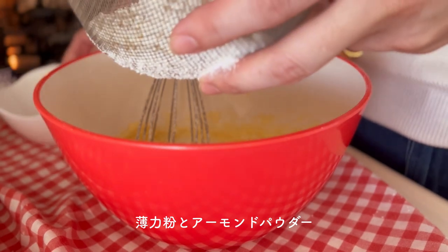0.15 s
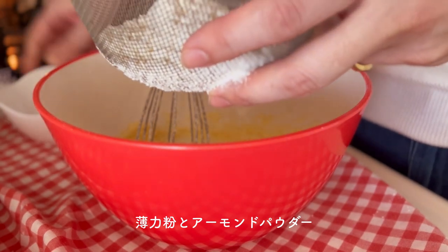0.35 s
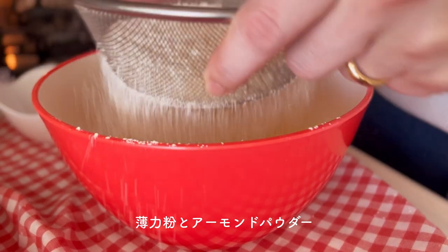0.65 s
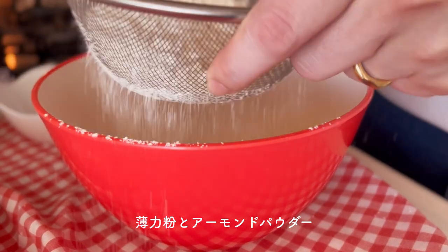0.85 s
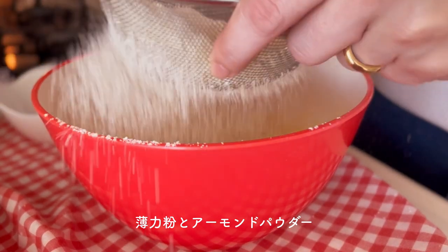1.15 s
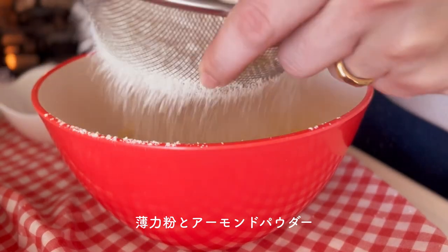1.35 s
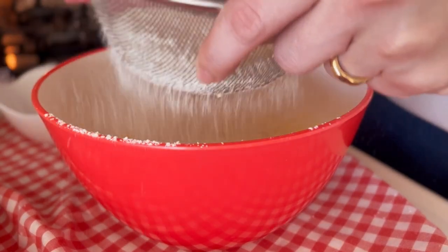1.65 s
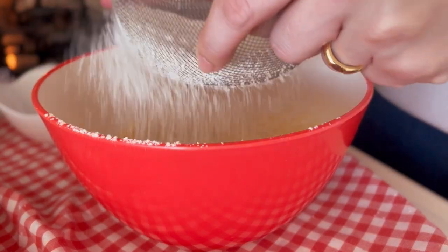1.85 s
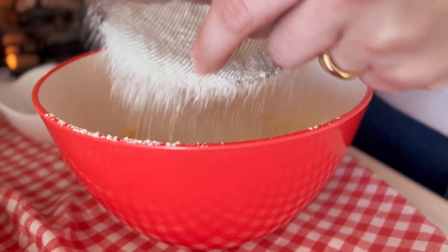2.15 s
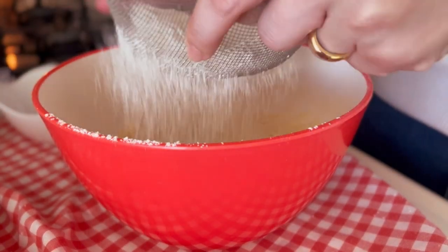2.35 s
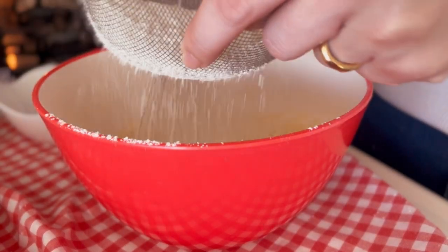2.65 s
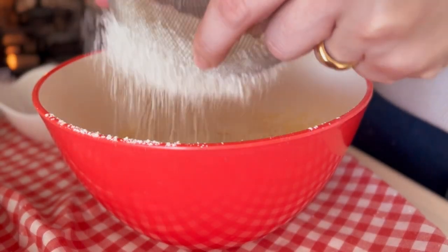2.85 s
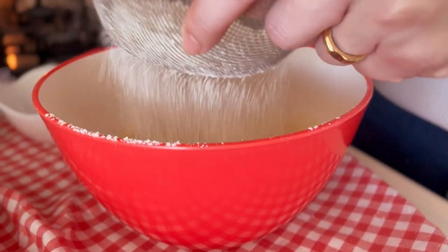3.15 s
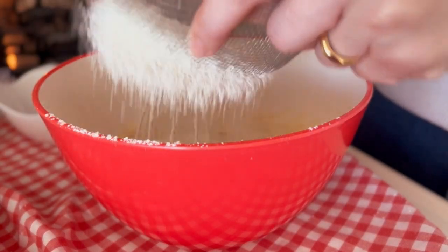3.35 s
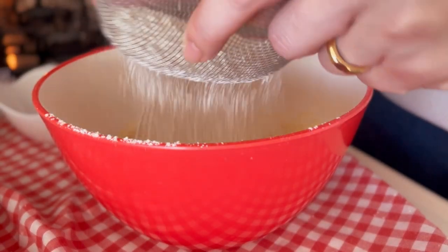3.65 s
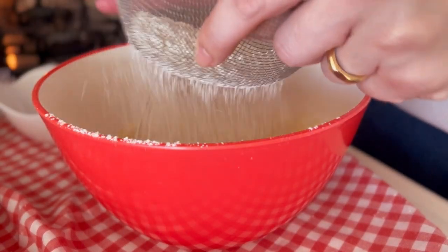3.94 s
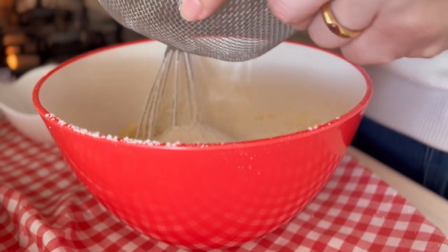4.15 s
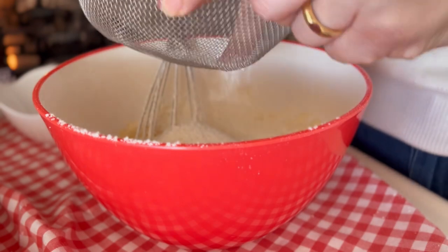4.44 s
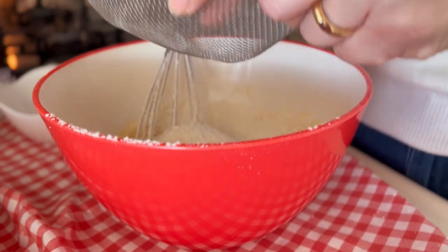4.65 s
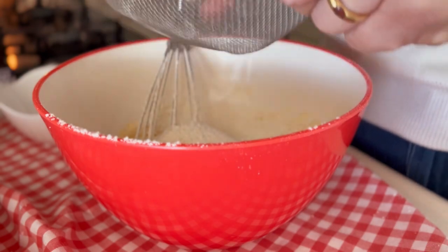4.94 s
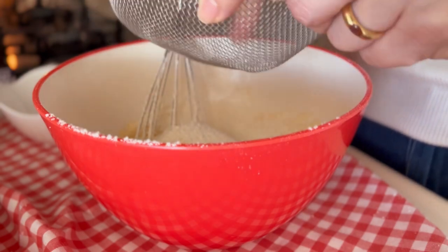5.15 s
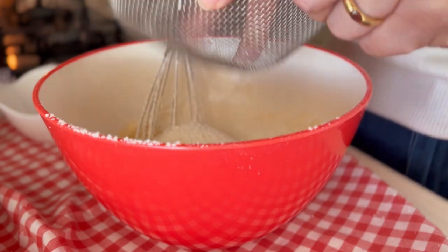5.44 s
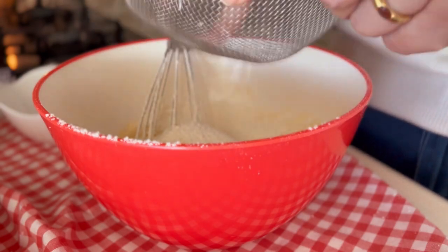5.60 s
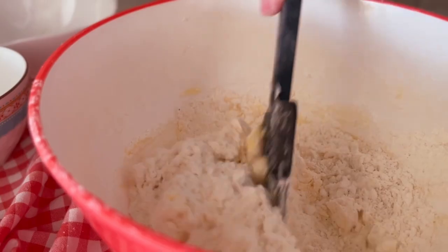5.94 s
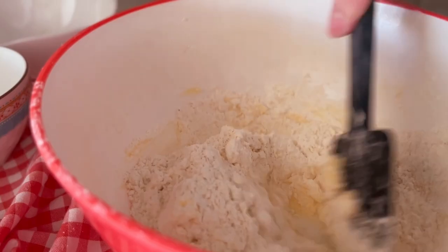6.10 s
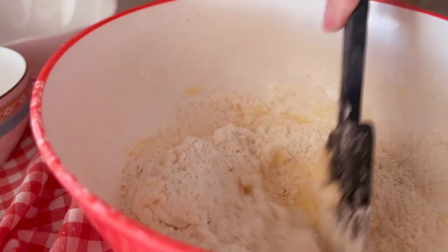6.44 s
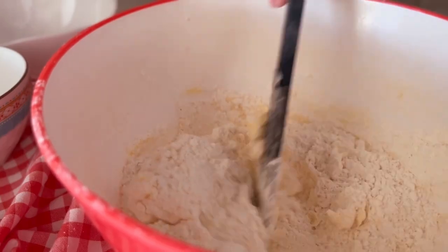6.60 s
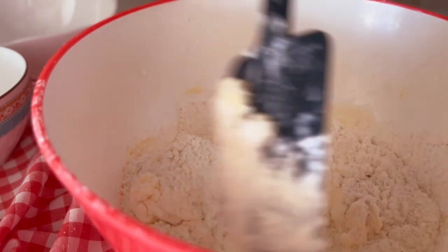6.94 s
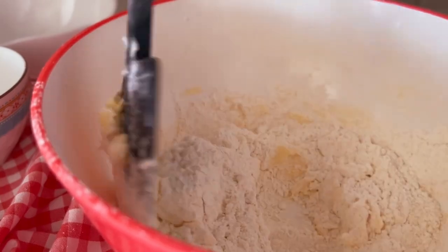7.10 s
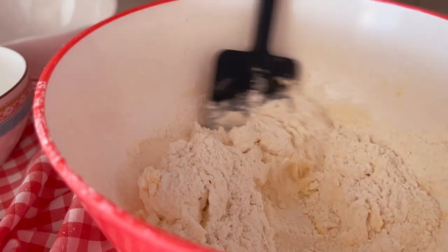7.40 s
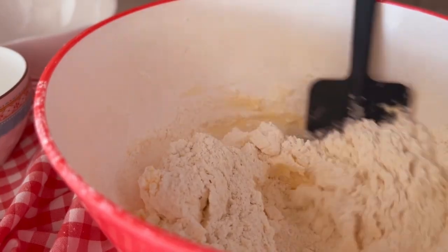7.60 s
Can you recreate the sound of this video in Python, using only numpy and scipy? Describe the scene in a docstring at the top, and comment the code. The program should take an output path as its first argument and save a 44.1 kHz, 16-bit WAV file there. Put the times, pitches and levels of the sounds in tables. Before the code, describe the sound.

A dull table thump, then a flour-filled wire sieve rattles in quick regular taps with soft hisses, before a spatula squelches and scrapes through batter.

```python
"""A dull thump on the table, then a wire sieve full of flour is shaken against a hand over a mixing bowl.
Each tap rattles the mesh and sends flour hissing through; fingers then rub the last lumps in the empty sieve.
A spatula then cuts through batter and scrapes round the bowl. A quiet kitchen hums behind.
Mesh, flour, batter and scrapes are shaped noise or clicks; the table and the sieve's frame are ringing modes."""
import sys
import numpy as np
from scipy import signal
from scipy.fft import rfft, irfft, next_fast_len
from scipy.io import wavfile

SR = 44100
rng = np.random.default_rng(int(sys.argv[2]) if len(sys.argv) > 2 else 0)


def generate_wav(sig):
    """Save sig (samples, or channels by samples) to the path in sys.argv[1] as 16-bit PCM at SR."""
    pcm = np.round(np.clip(np.atleast_2d(sig).T, -1, 1) * 32767).astype(np.int16)
    wavfile.write(sys.argv[1], SR, pcm)


N = 342392
T = np.arange(N) / SR
PADDED = next_fast_len(N, real=True)
HZ = np.maximum(np.arange(PADDED // 2 + 1) * SR / PADDED, 1)
EMPTIED_S = 4.15   # the sieve is nearly empty from here
SPATULA_S = 5.89   # the sieve stops and the spatula part begins


def amp(db):
    """dB to gain."""
    return 10 ** (np.asarray(db) / 20)


def levels(rows):
    """Columns of a curve table over time; -200 outside its span, which is silence for a level."""
    s, *columns = np.transpose(rows)
    return [np.interp(T, s, column, left=-200, right=-200) for column in columns]


def at_hz(points):
    """A frequency table read at every frequency, straight lines over log frequency."""
    hz, value = np.transpose(points)
    return np.interp(np.log(HZ), np.log(hz), value)


def grains(spectrum, per_s=None, spread_db=0.0):
    """Two draws of coloured noise, or of uneven clicks at shared moments, about per_s a second; rms 1."""
    x = rng.standard_normal((2, N))
    if per_s:
        struck = rng.random(N) < per_s / SR
        unevenness = amp(spread_db * np.minimum(rng.exponential(1, N), 4))
        x = x * struck * unevenness
    x = irfft(rfft(x, PADDED) * amp(at_hz(spectrum)), PADDED)[:, :N]
    return x / x.std()


def flicker(rate_hz, depth_db):
    """A smoothly wandering random gain."""
    r = np.exp(-2 * np.pi * rate_hz / SR)
    # one extra second lets the smoother settle
    slow = signal.lfilter([1], [1, -2 * r, r * r], rng.standard_normal(N + SR))[SR:]
    return amp(depth_db * slow / slow.std())


def add(track, s, db, rise_s, t60, hold_s=0.0):
    """Add an envelope that swells for rise_s, may hold, and then dies away."""
    t = T[:SR // 2]
    i = round(s * SR)
    swell = np.minimum(t / rise_s, 1) ** 2
    decay = amp(-60 * np.maximum(t - rise_s - hold_s, 0) / t60)
    track[i:i + len(t)] += amp(db) * swell * decay


def swells(rows, rise_db_per_s, fall_db_per_s):
    """Strokes that swell, hold and fade at steady rates in dB."""
    total = 0
    for start, end, db in rows:
        before = rise_db_per_s * (start - T)
        after = fall_db_per_s * (T - end)
        total = total + amp(db - np.maximum(np.maximum(before, after), 0))
    return total


def click(s, db):
    """One impulse."""
    return amp(db) * (np.arange(N) == round(s * SR))


def ring(clicks, hz, t60):
    """A damped resonance: a unit click sets a sine of height 1 ringing."""
    r, w = amp(-60 / (t60 * SR)), 2 * np.pi * hz / SR
    # the tiny offset keeps the filter's numbers from shrinking towards zero
    return signal.lfilter([0, np.sin(w)], [1, -2 * r * np.cos(w), r * r], clicks + 1e-18)


# colour of the low rumble: f/Hz, level/dB per Hz
RUMBLE = [(12, -32), (20, -23), (35, -7), (86, -3.5), (113, -10), (160, -8), (184, -21), (214, -16.5),
          (242, -17.5), (400, -26.5), (520, -67), (880, -120)]
# slow swell of the rumble: t/s, level/dB
RUMBLE_SWELL = [(0, -50.5), (0.7, -55), (2.1, -56), (2.6, -54.5), (4.3, -54.5), (5.0, -56), (5.35, -54),
                (5.89, -56), (7.76, -53)]
# colour of the narrow hum: f/Hz, level/dB per Hz
HUM = [(70, -66), (81, -10.5), (86, 10.5), (91, -1), (105, -59.5)]
# wavering of the hum: t/s, level/dB
HUM_SWELL = [(0, -55), (0.68, -69), (1.27, -57), (1.86, -79), (2.39, -54), (2.99, -57.5), (3.35, -52),
             (3.75, -48.5), (3.98, -58.5), (5.1, -68), (5.35, -53), (5.6, -68), (5.89, -58)]
# colour of the faint air noise: f/Hz, level/dB per Hz
AIR = [(150, 1), (350, -2.5), (700, -3), (1500, -6.5), (2000, -16), (3500, -21), (6500, -36), (8300, -22.5),
       (10000, -27), (12300, -22.5), (13300, -44), (14000, -90)]
# a faint wavering whistle far off: t/s, level/dB
WHISTLE = [(2.7, -100), (2.79, -77), (3.0, -83), (3.14, -78.5), (3.27, -82), (3.29, -86), (3.9, -91),
           (4.05, -110)]
AIR_DB, SPATULA_AIR_DB = -63.5, -57.5   # the air noise steps up when the spatula part begins


def kitchen():
    """Noise bands make rumble, wavering hum and air that steps up at SPATULA_S; a sine whistles far off."""
    rumble = amp(levels(RUMBLE_SWELL)[0]) * grains(RUMBLE)
    hum = amp(levels(HUM_SWELL)[0]) * grains(HUM)
    air = amp(np.where(T < SPATULA_S, AIR_DB, SPATULA_AIR_DB)) * grains(AIR)
    pitch_hz = 3197 * flicker(40, .035)
    whistle = np.sqrt(2) * np.sin(np.cumsum(2 * np.pi * pitch_hz / SR)) * flicker(30, 2)
    return rumble + hum + air + amp(levels(WHISTLE)[0]) * whistle


# contacts on the table: t/s, level/dB, low-pass brightness f/Hz
THUMPS = [(0.0922, -23, 2950), (0.097, -14.5, 1500), (0.104, -16.5, 1200), (0.116, -20, 900)]
# modes of the table: f/Hz, level/dB, t60/s
TABLE = [(58.6, -9, 0.42), (85.3, -5.5, 0.17), (102.6, -5.5, 0.14), (130.6, -9, 0.37), (216, -16, 0.39),
         (287, -16, .1), (336, 1.5, 0.086), (499, -24, 0.26), (603, -13.5, 0.11), (804.4, -12, 0.27),
         (960, -18, 0.13), (1250, -31, 0.13), (1397, -26, 0.13), (1612, -14.5, 0.067)]
# a softer, deeper thud that follows: t/s, level/dB, f/Hz, t60/s
AFTER_THUD = [(0.283, -33, 60.6, 0.45), (0.281, -29, 94, 0.067)]
# colour of the thump's echo: f/Hz, level/dB per Hz
THUMP_TAIL = [(40, -24), (100, -20), (300, -5.5), (1000, -18.5), (2000, -30.5), (3300, -46), (4200, -53),
              (6000, -78)]
# colour of the first touch: f/Hz, level/dB per Hz
CRACK = [(500, -13), (1600, 1.5), (2200, -3), (3500, -6.5), (5500, -18), (7000, -24.5), (10000, -31.5),
         (12000, -60)]


def thump():
    """Soft contacts ring the table's modes; the kitchen returns a short dull echo."""
    push = 0
    for s, db, hz in THUMPS:
        push = push - signal.sosfilt(signal.butter(2, hz, fs=SR, output="sos"), click(s, db))
    out = np.zeros((2, N))
    for k, (hz, db, t60) in enumerate(TABLE):
        # neighbouring modes radiate a little to opposite sides
        out += amp(db) * ring(push, hz, t60) * [[1], [(-1) ** k / 4]]
    for s, db, hz, t60 in AFTER_THUD:
        out[0] -= ring(click(s, db), hz, t60)
    echo, crack = np.zeros((2, N))
    add(echo, THUMPS[0][0], -27.5, rise_s=.008, t60=.22)
    add(crack, THUMPS[0][0], -40, rise_s=.005, t60=.06)
    return out + echo * grains(THUMP_TAIL) + crack * grains(CRACK)


# colour of the bowl being pushed: f/Hz, level/dB per Hz
SHOVE = [(20, -52), (45, 2.5), (85, 3), (150, -8.5), (260, -14.5), (400, -36), (900, -100)]
# push on the bowl: t/s, level/dB
SHOVING = [(5.9, -60), (5.916, -42.5), (6.056, -47), (6.108, -37), (6.264, -43), (6.45, -44.5), (6.62, -41),
           (6.8, -46.5), (7.0, -41.5), (7.034, -45.5), (7.07, -38.5), (7.2, -47.5), (7.5, -42),
           (7.76, -43.5)]
# colour of squelching batter: f/Hz, level/dB per Hz
BATTER = [(150, -4.5), (300, 4), (700, 0), (1400, -3.5), (2500, -21), (4500, -44), (7000, -53),
          (13500, -90)]
# colour of dry flour being stirred: f/Hz, level/dB per Hz
DRY = [(2500, -9), (4500, -7.5), (7500, -1), (11500, -4), (13000, -13), (13800, -26), (15000, -80)]
# colour of the blade on the bowl wall: f/Hz, level/dB per Hz
SCRAPE = [(1200, -18), (1750, -19.5), (1950, -3.5), (2600, -4.5), (3400, -6.5), (3900, -9), (5000, -12.5),
          (8000, -27), (12000, -90)]
# cuts through the batter: start t/s, end t/s, dry flour hiss level/dB
CUTS = [(5.93, 6.06, -69.5), (6.102, 6.13, -58.5), (6.27, 6.29, -73), (6.33, 6.42, -67.5),
        (6.49, 6.52, -71.5), (6.61, 6.67, -70), (6.68, 6.74, -67)]
# last sweep round the wall: t/s, batter squelch level/dB, dry flour hiss level/dB, scrape level/dB
SWEEP = [(7.034, -66, -86, -71), (7.056, -65, -50.5, -65), (7.098, -63, -61, -69), (7.172, -62, -51, -63),
         (7.19, -54.5, -52.5, -46.5), (7.348, -58, -46.5, -45.5), (7.498, -57, -54, -57),
         (7.546, -61, -47, -58), (7.666, -57.5, -53.5, -56), (7.722, -46, -50, -53.5),
         (7.76, -60, -49.5, -59)]
# rough moving bands sung by the blade's edge, one list each: t/s, level/dB, f/Hz
EDGE = [
    [(7.06, -88, 2647), (7.08, -61.5, 2640), (7.17, -58, 2803), (7.2, -54, 2695), (7.27, -55, 3220),
     (7.33, -49, 2960), (7.41, -52, 3050), (7.46, -63, 3500), (7.52, -90, 3980)],
    [(7.175, -90, 2100), (7.19, -53, 2197), (7.27, -46, 2398), (7.33, -52, 2250), (7.38, -56, 1354),
     (7.48, -55, 1440), (7.55, -54, 1954), (7.63, -55.5, 2000), (7.76, -58, 2000)],
]
# colour of the blade pressed through wet batter: f/Hz, level/dB per Hz
RUB = [(400, -19), (750, 1.5), (1400, -1.5), (2300, -11.5), (3200, -7), (4500, -16), (7000, -50),
       (12000, -100)]
# the blade sinks back into batter: t/s, level/dB
WET_RUB = [(7.19, -80), (7.3, -53), (7.41, -49), (7.76, -48.5)]
CUT_RISE_DB_PER_S, CUT_FALL_DB_PER_S = 900, 340   # the blade bites faster than it lets go
SQUELCH_DB, GRAZE_DB = 3, -0.5   # batter and blade scrape against the hiss of a cut
RESTING_BATTER_DB, RESTING_DRY_DB, RESTING_SCRAPE_DB = -59.5, -76.5, -77   # a floor under the strokes


def spatula():
    """The blade shoves the bowl, squelches in batter, stirs dry flour, scrapes the wall and sings at its edge."""
    cuts = swells(CUTS, CUT_RISE_DB_PER_S, CUT_FALL_DB_PER_S)
    batter, dry, scrape = amp(levels(SWEEP))
    batter = batter + amp(SQUELCH_DB) * cuts + amp(RESTING_BATTER_DB)
    dry = dry + cuts + amp(RESTING_DRY_DB)
    scrape = scrape + amp(GRAZE_DB) * cuts + amp(RESTING_SCRAPE_DB)

    # a narrow band of noise is carried along each moving pitch
    narrow = [(20, -5), (170, -7), (450, -21), (1000, -27), (8000, -90)]
    in_phase, quadrature = grains(narrow), grains(narrow)
    edge = 0
    for db, hz in map(levels, EDGE):
        turn = np.cumsum(2 * np.pi * hz / SR)
        band = in_phase * np.cos(turn) + quadrature * np.sin(turn)
        edge = edge + amp(db) * flicker(27, 3.4) * band

    out = edge + amp(levels(SHOVING)[0]) * flicker(6.4, 2.0) * grains(SHOVE)
    out += batter * flicker(20, 0.43) * grains(BATTER, per_s=4000, spread_db=1.5)
    out += dry * flicker(28, 1.55) * grains(DRY)
    out += amp(levels(WET_RUB)[0]) * flicker(36, 0.74) * grains(RUB)
    out += scrape * flicker(34, 1.55) * grains(SCRAPE, per_s=9000, spread_db=-0.5)
    return out * (T >= SPATULA_S)


# modes of the sieve's metal frame: f/Hz, level/dB, t60/s
RIM = [(3840, -9, 0.012), (4060, 0, 0.022), (4060, -4, .012), (4100, 3, 0.036), (4240, 2, 0.039),
       (4290, 0.5, 0.033), (4380, -7, .015), (5600, -9, .015), (7700, -4, .03), (8300, -4, .03)]
# the frame is caught, then buzzes on: t/s, level/dB, t60/s of the buzz, pitch factor that shifts with the grip
RIM_HITS = [(5.05, -95.5, .3, 1.09), (5.31, -88, 0.14, 1.11), (5.505, -88, .05, 1.13),
            (5.52, -91.5, .06, 1), (5.619, -63.5, 0.011, 0.99), (5.62, -80, 0.32, 1.01),
            (5.797, -70.5, 0.012, .98), (5.801, -85, 0.2, 0.94)]


def rim():
    """The wires buzz on for a moment and keep feeding the frame's modes, so the ring is rough."""
    out = np.zeros((2, N))
    for s, db, t60, pitch in RIM_HITS:
        buzz, i = np.zeros(SR // 2), round(s * SR)
        add(buzz, 0, db, rise_s=.002, t60=t60)
        buzz = buzz * rng.standard_normal((2, SR // 2))
        for hz, mode_db, ring_s in RIM:
            out[:, i:i + SR // 2] += amp(mode_db) * ring(buzz, pitch * hz, ring_s)
    return out


# colour of the mesh when full of flour: f/Hz, level/dB per Hz
MESH = [(2500, -23), (4300, -24), (4900, -3.5), (5350, -10), (5900, -2), (6900, -5), (7600, 1.5),
        (8000, -1.5), (8500, -1), (9200, -2.5), (10200, -2.5), (11600, -1), (13000, -19), (15000, -13),
        (16500, -33)]
# colour of the nearly empty sieve: f/Hz, level/dB per Hz
BARE_MESH = [(1500, -28.5), (2400, -24.5), (3400, -29), (4200, -22), (4900, -15), (6000, -6.5),
             (7000, -4.5), (7700, 0), (8200, -3), (8900, -2), (10000, -6), (11500, -5.5), (13000, -17),
             (15000, -17), (16500, -40)]
# colour of flour running through the mesh: f/Hz, level/dB per Hz
FLOUR = [(3000, -28), (4400, -8), (4900, -6.5), (5400, 0), (6000, -7.5), (7000, -3), (8000, 2),
         (8700, -2.5), (10200, -3.5), (11700, -7), (13000, -9)]
# colour of the knock on the palm: f/Hz, level/dB per Hz
PALM = [(150, -1), (350, 8), (700, 3), (1300, -13), (2500, -23), (4000, -32)]
# taps against the hand: t/s, rattle level/dB, palm knock level/dB, flour hiss level/dB
TAPS = [(0.5611, -37.5, -54, -57), (0.758, -36.5, -50, -59), (0.9251, -40, -48.5, -61.5),
        (1.1029, -45, -55, -63), (1.26, -53.5, -59, -79), (1.406, -42, -51, -67), (1.5567, -52.5, -59, -67),
        (1.702, -58, -57, -72), (1.852, -57, -64, -85), (2, -50.5, -59, -63), (2.159, -44.5, -58, -63.5),
        (2.3285, -42, -54, -59.5), (2.4988, -40.5, -50.5, -59.5), (2.6755, -32, -47.5, -53.5),
        (2.8505, -42.5, -51.5, -61), (3.03, -41.5, -60, -59.5), (3.1931, -41, -58, -62.5),
        (3.3697, -40, -56, -56), (3.5315, -42, -55, -62), (3.707, -40, -63, -56), (3.8682, -50, -75, -68),
        (4.338, -51, -70, -69), (4.4697, -51.5, -67, -81), (4.544, -53, -70, -63), (4.5875, -50, -71, -70),
        (4.6935, -36.5, -76, -71), (4.887, -49, -79, -89), (4.9849, -35.5, -72, -50.5),
        (5.129, -45.5, -71, -69), (5.225, -46, -67, -70), (5.23, -33.5, -70, -55), (5.317, -43, -73, -63),
        (5.3314, -49, -68, -91), (5.4389, -31.5, -58.5, -48.5), (5.5098, -47.5, -76, -63),
        (5.5206, -49, -74, -78), (5.619, -21.5, -79, -51.5), (5.7119, -46, -70, -67),
        (5.797, -23, -54, -43)]
# back-swings between taps, where the flour slides across the mesh: t/s, rattle level/dB
SWINGS = [(0.6923, -63.5), (0.7214, -61), (0.87, -65), (0.9872, -74), (1.0311, -62), (1.0574, -61.5),
          (1.1953, -58), (1.252, -59), (1.3477, -57), (1.3653, -67), (1.496, -57.5), (1.647, -63),
          (1.783, -59), (1.84, -64), (1.935, -63), (2.104, -60), (2.281, -65.5), (2.438, -61),
          (2.6264, -61), (2.8075, -66), (2.9841, -63), (3.1477, -68), (3.329, -56), (3.481, -61.5),
          (3.6561, -60), (3.822, -63), (3.908, -63), (3.9903, -66), (4.309, -58.5), (4.44, -61),
          (4.685, -55), (4.861, -61), (5.0534, -65)]
# flour running through by itself: t/s, level/dB
TRICKLE = [(0.54, -88), (0.66, -79.5), (1.38, -78), (1.92, -86), (2.3, -80), (2.77, -78), (3.12, -83),
           (3.75, -79), (4.0, -101), (4.3, -88), (5.8, -85), (5.89, -63)]
# lumps rubbed on the mesh: start t/s, end t/s, level/dB
FINGER_RUBS = [(4.29, 4.345, -71.5), (4.42, 4.56, -70), (4.73, 4.87, -65), (5.04, 5.09, -64),
               (5.25, 5.29, -65), (5.46, 5.5, -75), (5.63, 5.7, -61.5)]
RATTLE_RISE_S, RATTLE_T60_S = 0.0065, 0.022   # for soft jolts, up to SOFT_DB
SOFT_DB, SHORTER_PER_DB = -57.5, 0.0089       # harder jolts are shorter by this share per dB
FULL_HISS_T60_S, EMPTY_HISS_T60_S = 0.16, 0.13
HISS_RISE_S, TAP_HOLD_S, SWING_HOLD_S = 0.0054, 0.016, 0.033
SWING_HISS_DB = -12   # against the rattle
RUB_EDGE_DB_PER_S = 313   # how fast finger rubs swell and fade


def sieve():
    """A jolt briefly rattles the wires; a tap also knocks on the palm, and flour is left hissing through."""
    rattle, hiss, knock = np.zeros((3, N))
    for s, db, palm_db, hiss_db in TAPS:
        hiss_t60 = FULL_HISS_T60_S if s < EMPTIED_S else EMPTY_HISS_T60_S
        add(hiss, s - .005, hiss_db, HISS_RISE_S, hiss_t60, TAP_HOLD_S)
        add(knock, s, palm_db, rise_s=.003, t60=.06)
    for s, db in SWINGS:
        add(hiss, s - .007, db + SWING_HISS_DB, HISS_RISE_S, FULL_HISS_T60_S, SWING_HOLD_S)
    for s, db, *_ in TAPS + SWINGS:
        length = 1 - SHORTER_PER_DB * max(db - SOFT_DB, 0)
        add(rattle, s - .004, db, RATTLE_RISE_S * length, RATTLE_T60_S * length)

    full = T < EMPTIED_S
    wires = np.where(full, grains(MESH), grains(BARE_MESH))
    full_flour = grains(FLOUR, per_s=9000, spread_db=1.5)
    last_flour = grains(BARE_MESH, per_s=9000, spread_db=1.5)
    flour = np.where(full, full_flour, last_flour)
    # the flour hiss is low-passed at 13.6 kHz
    flour = signal.sosfilt(signal.butter(8, 13600, fs=SR, output="sos"), flour)
    rubs = swells(FINGER_RUBS, RUB_EDGE_DB_PER_S, RUB_EDGE_DB_PER_S)
    flow = hiss + amp(levels(TRICKLE)[0]) + rubs
    flow = flow * flicker(60, 0.78) * flicker(6.0, 1.0)
    return (rattle * wires + flow * flour + knock * grains(PALM) + rim()) * (T < SPATULA_S)


# left-right likeness of the two microphone ports: f/Hz, likeness from 0 to 1
LIKENESS = [(60, 1), (250, 0.81), (550, 0.27), (1500, 0.075), (2100, 0.79), (3500, 0.29), (5300, 0.58),
            (6200, 0.78), (7500, 0.96), (9100, 0.99), (10500, 0.54), (12000, 0.88), (12700, 0.97),
            (13700, 1), (14500, .75)]
# level tilt between the ports: f/Hz, left minus right level/dB
LOUDER_LEFT = [(60, 1.0), (300, -.5), (700, 1.5), (2400, 0.8), (4400, 4), (8000, -1), (12000, 0)]


def ports(draws, lead_table):
    """Two draws give what the ports share and what differs; left is then shifted against right in phase and level."""
    shared, own = rfft(draws, PADDED)
    alike = np.clip(at_hz(LIKENESS), 0, 1)
    shared = shared * np.sqrt((1 + alike) / 2)
    own = own * np.sqrt((1 - alike) / 2)
    # half the shift goes to each port
    lead = np.exp(.5j * at_hz(lead_table)) * amp(at_hz(LOUDER_LEFT) / 2)
    return irfft(np.array([(shared + own) * lead, (shared - own) / lead]), PADDED)[:, :N]


# phase by which left leads right: f/Hz, lead/rad
LEAD = [(20, 0), (340, 0), (800, 3.1), (1250, 2.5), (1800, -.2), (2500, .3), (3500, 1.1), (4800, 0),
        (5700, -2.1), (6500, -3.2), (8500, -6.0), (9500, -6.3), (12300, -9.4), (13500, -9.45),
        (15300, -12.0), (17000, -12.5)]
# the same for the thump, which comes from another side: f/Hz, lead/rad
THUMP_LEAD = [(20, 0), (300, 0.63), (1030, 2.5), (1980, 9), (5000, 6), (7400, 0.5), (9500, 0.8),
              (16000, -4)]


def scene():
    """Everything reaches the same pair of ports, the thump from its own side."""
    return ports(kitchen() + spatula() + sieve(), LEAD) + ports(thump(), THUMP_LEAD)


def record(dry):
    """The deepest bass rolls off and the top is cut."""
    dry = signal.sosfilt(signal.butter(4, 40, "high", fs=SR, output="sos"), dry)
    return signal.sosfilt(signal.cheby2(12, 70, 16800, fs=SR, output="sos"), dry)


dry = scene()
out = record(dry)
generate_wav(out)
```